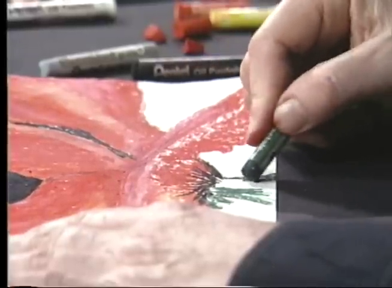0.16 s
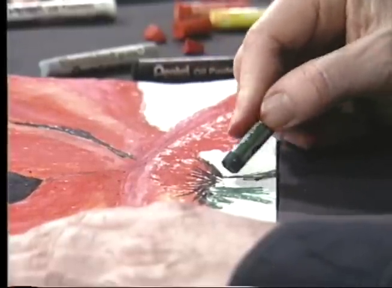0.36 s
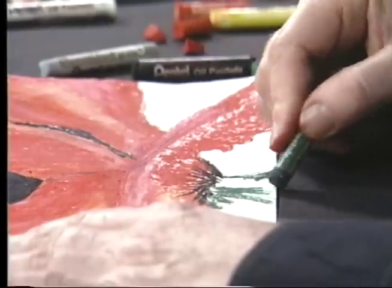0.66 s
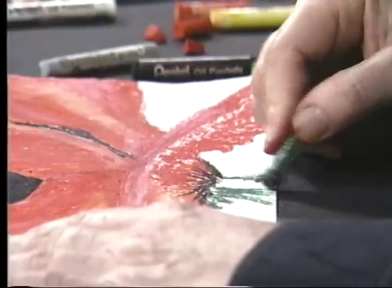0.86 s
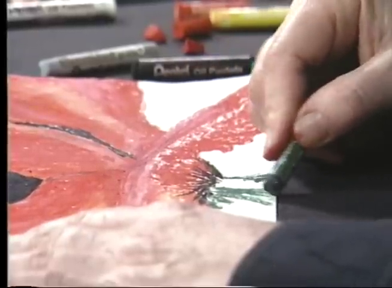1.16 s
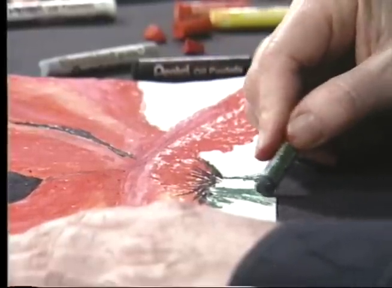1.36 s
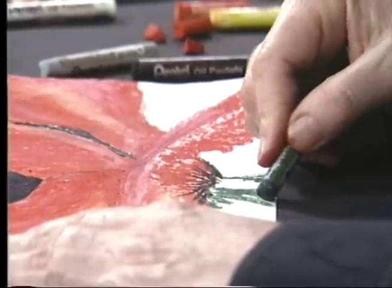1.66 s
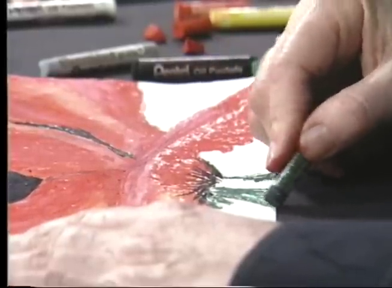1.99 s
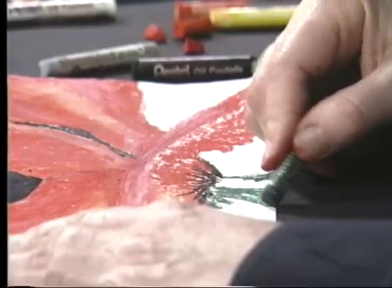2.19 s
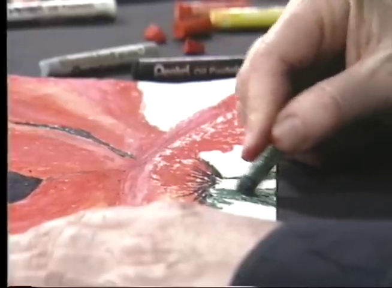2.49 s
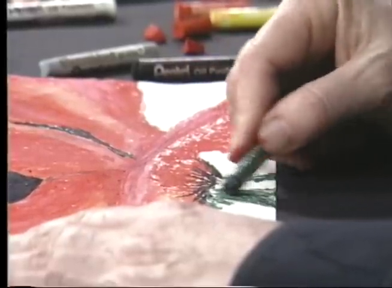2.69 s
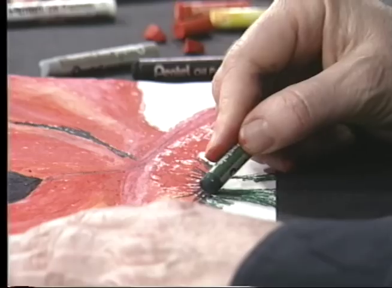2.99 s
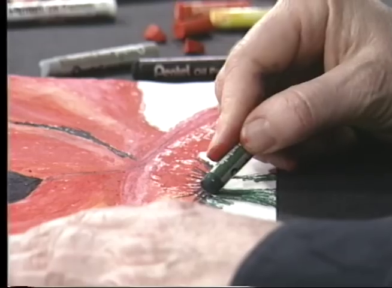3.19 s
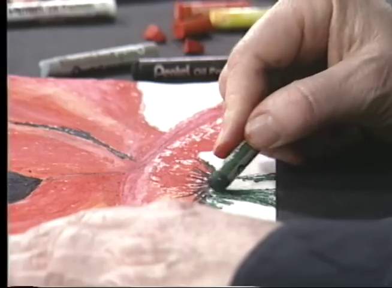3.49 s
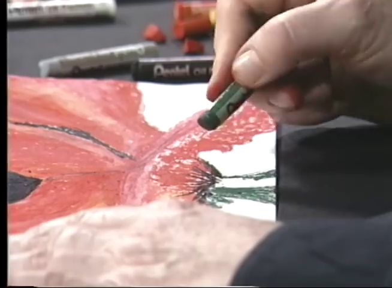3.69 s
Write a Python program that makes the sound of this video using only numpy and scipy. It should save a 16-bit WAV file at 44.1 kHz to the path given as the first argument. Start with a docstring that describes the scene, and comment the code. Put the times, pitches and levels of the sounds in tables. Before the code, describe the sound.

Quiet, dry scratching of a pastel stick on paper starts in scattered strokes, turns into rapid rubbing, pauses and briefly resumes. Light taps and dull bumps on the table come between, indoors over electrical hum, all on the left side.

```python
"""A dry scratching sounds over a steady hum: an oil pastel rubbed to and fro on paper on a table,
in short strokes, about twelve a second. Stick-slip friction on the paper's tooth makes the crackle.
Now and then the stick taps the table and rings its modes; the hand bumps it and brushes the sheet.
Mains hum, hiss and a thin electrical whine lie beneath. The microphone feeds the left channel only."""
import sys
import numpy as np
from scipy import signal
from scipy.fft import rfft, irfft
from scipy.io import wavfile

SR = 44100
rng = np.random.default_rng(int(sys.argv[2]) if len(sys.argv) > 2 else 0)


def generate_wav(sig):
    """Save sig (samples, or channels by samples) to the path in sys.argv[1] as 16-bit PCM at SR."""
    pcm = np.round(np.clip(np.atleast_2d(sig).T, -1, 1) * 32767).astype(np.int16)
    wavfile.write(sys.argv[1], SR, pcm)


N = 169785
TIME = np.arange(N) / SR

# room rumble and microphone hiss: frequency_hz, density_db_per_hz
FLOOR_SPECTRUM = [(12, -77), (27, -80), (48, -69), (85, -84), (160, -84.5), (230, -88), (340, -93),
                  (500, -98.5), (780, -99), (1150, -104), (2000, -105), (4000, -107), (15000, -107.5)]
# circuit noise of the idle right channel: frequency_hz, density_db_per_hz
IDLE_SPECTRUM = [(20, -112), (64, -111), (85, -85.5), (140, -112.5), (230, -109), (320, -128), (550, -123),
                 (15000, -122.5)]
# harmonics of the mains: harmonic_number, rms_db
HUM_HARMONICS = [(1, -67.5), (2, -70.5), (3, -52.5), (5, -62), (6, -77), (7, -75), (8, -83.5), (9, -69),
                 (11, -77), (12, -134), (13, -79), (15, -71.5), (17, -81), (21, -88), (27, -84.5),
                 (29, -113.5), (31, -106), (33, -88), (39, -87), (45, -89)]
MAINS_HZ, HUM_PHASE_SPREAD_RAD = 59.98, 1.17
# tones of the electrical whine: pitch_hz, wander_hz, relative_db
WHINE_TONES = [(15675, 22, -67), (15724, 20, -66)]
WHINE_GAIN_DB, WANDER_BANDWIDTH_HZ = -0.5, 35
# constant bias, left row then right row: offset_full_scale
DC_OFFSETS = [
    [.0328],
    [.0437],
]
CUTOFF_HZ = 15850

# slides of the side of the hand on the paper: start_s, length_s, level_db, lowpass_hz
HAND_SLIDES = [(0.955, 0.29, -64.5, 900), (3.538, 0.31, -66, 1810)]
# dull rustle of skin on paper: frequency_hz, relative_density_db
RUSTLE_SPECTRUM = [(120, -26), (300, -3), (450, -3.5), (700, -2.5), (1100, -8.5), (2600, -14), (4500, -14),
                   (12000, -30)]
# soft bumps of the hand on the table: start_s, level_db
HAND_BUMPS = [(0.426, -40.5), (.878, -45), (1.385, -43), (2.448, -48), (2.744, -53), (3.15, -49)]
BUMP_HZ, BUMP_T60_S = 57.6, 0.069

# taps of the stick: start_s, impulse_db, highpass_hz, lowpass_hz, thump_db
STICK_TAPS = [(.469, -43, 450, 600, -62), (.861, -42.5, 700, 1700, -66), (.866, -40, 600, 950, -52),
              (.870, -53, 500, 900, -58), (.882, -39.5, 550, 4200, -29.5), (1.321, -39, 298, 800, -41),
              (1.327, -42, 302, 600, -60), (1.334, -50, 300, 650, -55), (1.645, -48, 250, 900, -52),
              (1.937, -68, 800, 2200, -65), (3.692, -47, 1300, 3200, -62), (3.712, -45, 1110, 2200, -60)]
THUMP_HZ, THUMP_T60_S = 173, 0.018
# modes of the table and the stick: pitch_hz, gain_db, t60_s
IMPACT_MODES = [(390, -2.5, 0.01), (616, -4, 0.018), (718, -5.5, 0.035), (900, -4, 0.016),
                (1340, -3.5, 0.0092), (1860, -5.5, 0.017), (2210, -8, 0.013), (2620, -18, 0.0086),
                (3294, -10, 0.017)]
ROOM_T60_S, ROOM_DB = 1, -5.5

# strokes of the pastel: start_s, length_s, level_db
PASTEL_STROKES = [(0.061, .06, -66), (.133, 0.053, -67), (0.453, .1, -70.5), (0.734, .068, -67),
                  (0.824, .048, -65), (0.876, 0.087, -67.5), (0.956, 0.083, -63), (1.04, 0.061, -67),
                  (1.112, 0.071, -63.5), (1.175, 0.1, -67.5), (1.269, 0.074, -62.5), (1.341, 0.13, -67),
                  (1.455, 0.07, -64.5), (1.526, 0.084, -67), (1.618, 0.071, -64.5), (1.738, 0.041, -68.5),
                  (1.802, 0.057, -64), (1.868, 0.073, -67), (1.951, 0.087, -64.5), (2.046, 0.078, -66),
                  (2.136, 0.058, -63), (2.22, .07, -65.5), (2.302, .072, -64), (2.383, 0.12, -65),
                  (2.52, 0.072, -62), (2.598, 0.099, -63.5), (2.728, 0.056, -61), (2.807, 0.067, -63),
                  (2.861, 0.064, -64.5), (3.41, 0.074, -67.5), (3.49, 0.078, -70.5), (3.565, 0.1, -66.5),
                  (3.671, 0.063, -62.5), (3.772, 0.14, -62.7)]
FRICTION_EXPONENT, SLIPS_PER_S, SLIP_SPREAD_DB = 0.76, 9000, 2
# resonances that colour the scratch: centre_hz, bandwidth_hz, gain_db
SCRATCH_RESONANCES = [(4790, 600, -8), (5060, 350, 4), (5960, 980, 2), (6560, 1700, -4), (8260, 800, -7)]
RUB_GAIN_DB, RUB_BAND_HZ = -13, [2800, 10500]


def from_db(db):
    """Logarithmic level: 20 dB is a factor of ten in amplitude."""
    return 10 ** (np.asarray(db) / 20)


def unit_rms(x):
    """Normalisation to a mean power of 1."""
    return x / np.sqrt(np.mean(x ** 2) + 1e-30)


def butterworth(x, hz, kind):
    """Butterworth filtering of second order: a maximally flat passband."""
    sections = signal.butter(2, np.minimum(hz, SR / 2 - 1), kind, fs=SR, output="sos")
    return signal.sosfilt(sections, x + 1e-18)


def resonance(x, hz, width_hz):
    """Forced vibration: a two-pole resonator with a peak gain of 1."""
    r, w = np.exp(-np.pi * width_hz / SR), 2 * np.pi * hz / SR
    return signal.lfilter(np.array([1, 0, -1]) * (1 - r * r) / 2, [1, -2 * r * np.cos(w), r * r], x)


def ring(force, hz, t60_s):
    """Damped free vibration: a unit impulse starts a decaying sine of height 1."""
    r, w = np.exp(-np.log(1000) / (t60_s * SR)), 2 * np.pi * hz / SR
    return signal.lfilter([0, np.sin(w)], [1, -2 * r * np.cos(w), r * r], force + 1e-18)


def impulse(start_s, db):
    """An ideal impact: one sample, with a flat spectrum."""
    return from_db(db) * (np.arange(N) == int(start_s * SR))


def friction_envelope(start_s, length_s):
    """Power law: friction noise follows a power of the speed, which rises and falls as a half sine."""
    progress = np.clip((TIME - start_s) / length_s, 0, 1)
    return np.sin(np.pi * progress).clip(0) ** FRICTION_EXPONENT


def steady_noise(spectrum):
    """Spectral shaping: white noise is weighted to the given density in dB per Hz."""
    hz, db = np.transpose(spectrum)
    bin_hz = np.maximum(np.arange(N // 2 + 1) * SR / N, 1)
    gain = from_db(np.interp(np.log(bin_hz), np.log(hz), db))
    return irfft(rfft(rng.standard_normal(N)) * gain, N) * np.sqrt(SR / 2)


def mains_hum():
    """A harmonic series on the mains frequency, with the odd members dominant."""
    hum = 0
    for harmonic, db in HUM_HARMONICS:
        phase = 2 * np.pi * round(harmonic) * MAINS_HZ * TIME + HUM_PHASE_SPREAD_RAD * rng.standard_normal()
        hum += np.sqrt(2) * from_db(db) * np.cos(phase)
    return hum


def electrical_whine():
    """Beating: two close tones at the top of hearing interfere as their pitches wander."""
    whine = 0
    for hz, wander_hz, db in WHINE_TONES:
        wander = unit_rms(butterworth(rng.standard_normal(N), WANDER_BANDWIDTH_HZ, "low"))
        phase = 2 * np.pi * np.cumsum(hz + wander_hz * wander) / SR
        whine += np.sqrt(2) * from_db(db + WHINE_GAIN_DB) * np.sin(phase)
    return whine


def room_tail(x):
    """Reverberation: a diffuse field decays exponentially."""
    tail = rng.standard_normal(SR) * np.exp(-np.log(1000) * TIME[:SR] / ROOM_T60_S)
    return from_db(ROOM_DB) * signal.fftconvolve(x, tail / np.linalg.norm(tail))[:N]


def hand_rustle():
    """Sliding friction: skin moving over the sheet gives a dull swell of noise."""
    rustle = steady_noise(RUSTLE_SPECTRUM)
    return sum(from_db(db) * friction_envelope(start, length) * unit_rms(butterworth(rustle, hz, "low"))
               for start, length, db, hz in HAND_SLIDES)


def table_thumps():
    """Damped oscillation: the table gives under each tap, and more slowly under the hand."""
    stick_force = sum(impulse(start, db) for start, *_, db in STICK_TAPS)
    hand_force = sum(impulse(start, db) for start, db in HAND_BUMPS)
    return ring(stick_force, THUMP_HZ, THUMP_T60_S) + ring(hand_force, BUMP_HZ, BUMP_T60_S)


def stick_taps():
    """Impact excites the modes of table and stick; a soft landing is dull, a glancing one thin."""
    force = 0
    for start, db, highpass_hz, lowpass_hz, _ in STICK_TAPS:
        softened = butterworth(impulse(start, db), lowpass_hz, "low")
        force += butterworth(softened, highpass_hz, "high")
    return sum((-1) ** k * from_db(db) * ring(force, hz, t60)   # neighbouring modes alternate in sign
               for k, (hz, db, t60) in enumerate(IMPACT_MODES))


def pastel_scratch():
    """Stick-slip friction: tiny slips on the paper's tooth drive resonances over a broad rubbing noise."""
    strokes = sum(from_db(db) * friction_envelope(start, length) for start, length, db in PASTEL_STROKES)
    sizes = from_db(SLIP_SPREAD_DB * np.minimum(rng.exponential(1, N), 5))
    signs = rng.choice([-1, 1], N)
    slips = sizes * signs * (rng.random(N) < SLIPS_PER_S / SR)
    crackle = sum(from_db(db) * resonance(slips, hz, width) for hz, width, db in SCRATCH_RESONANCES)
    rub = butterworth(rng.standard_normal(N) * slips.std(), RUB_BAND_HZ, "band")
    return strokes * unit_rms(crackle + from_db(RUB_GAIN_DB) * rub)


def scene():
    """Superposition: drawing and background add on the left; the right has only faint circuit noise."""
    taps = stick_taps()
    drawing = pastel_scratch() + taps + room_tail(taps) + table_thumps() + hand_rustle()
    left = drawing + mains_hum() + electrical_whine() + steady_noise(FLOOR_SPECTRUM)
    return np.array([left, steady_noise(IDLE_SPECTRUM)])


def record(dry):
    """Bias and band limiting: each channel gains a constant offset and loses all above the cutoff."""
    passband = np.arange(N // 2 + 1) * SR / N < CUTOFF_HZ
    return irfft(rfft(dry + DC_OFFSETS) * passband, N)


dry = scene()
out = record(dry)
generate_wav(out)
```